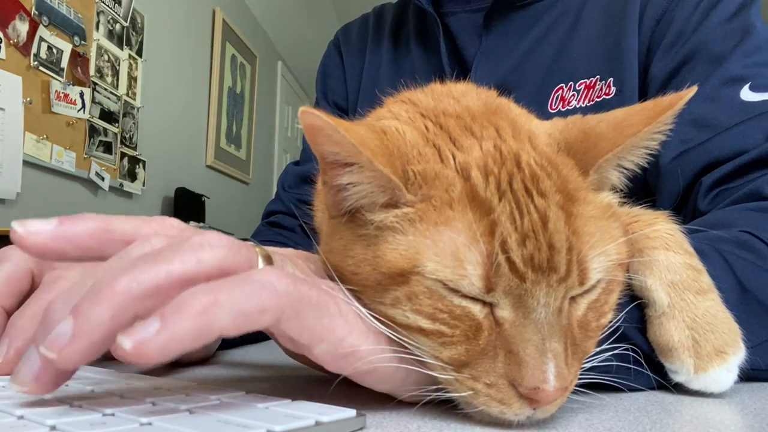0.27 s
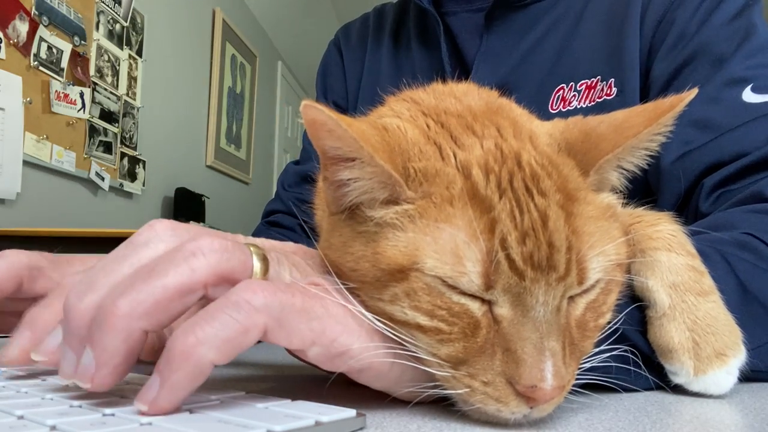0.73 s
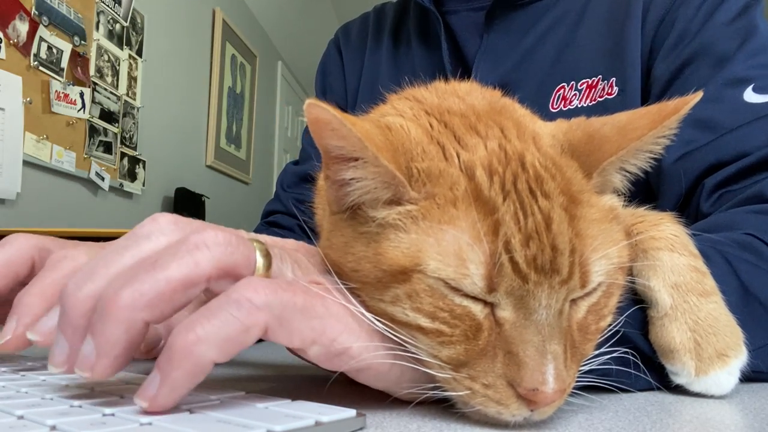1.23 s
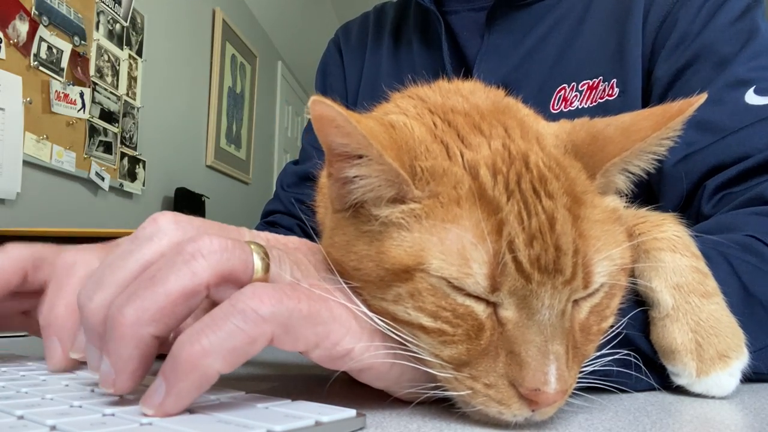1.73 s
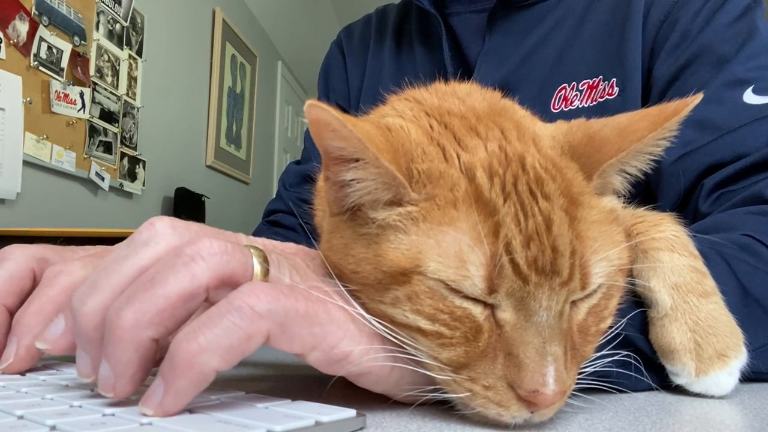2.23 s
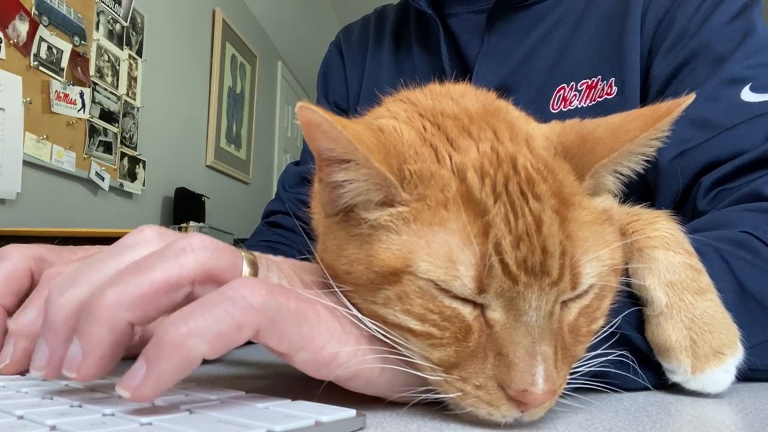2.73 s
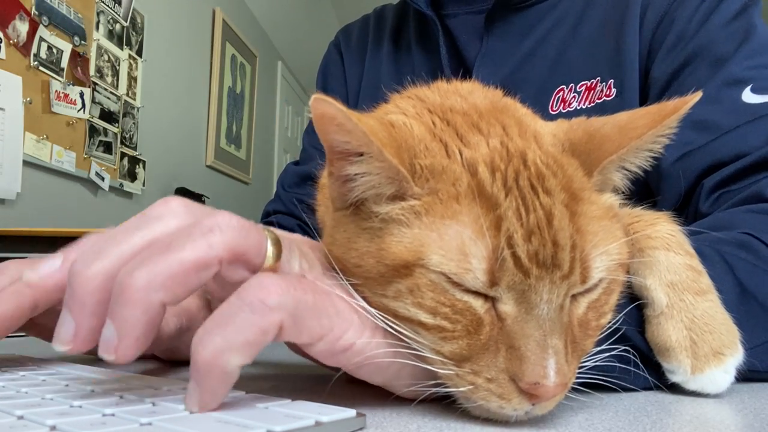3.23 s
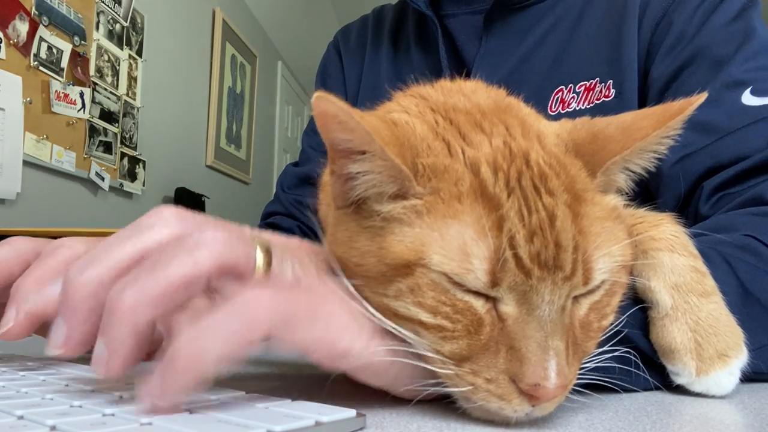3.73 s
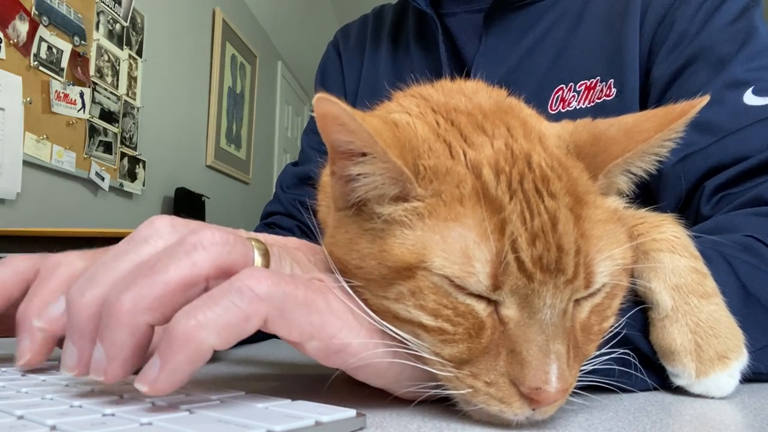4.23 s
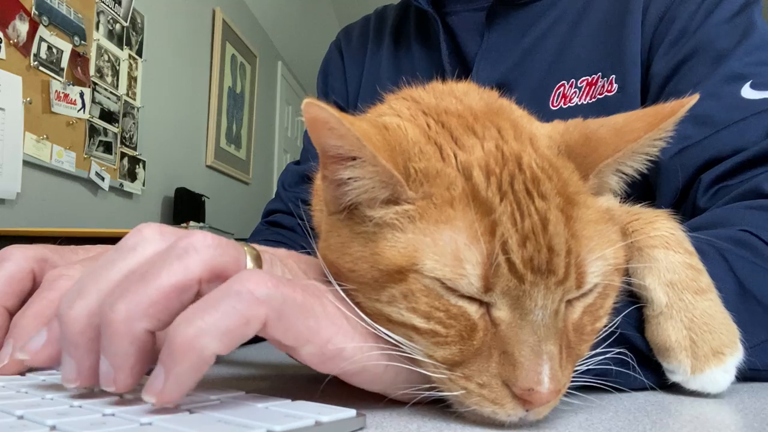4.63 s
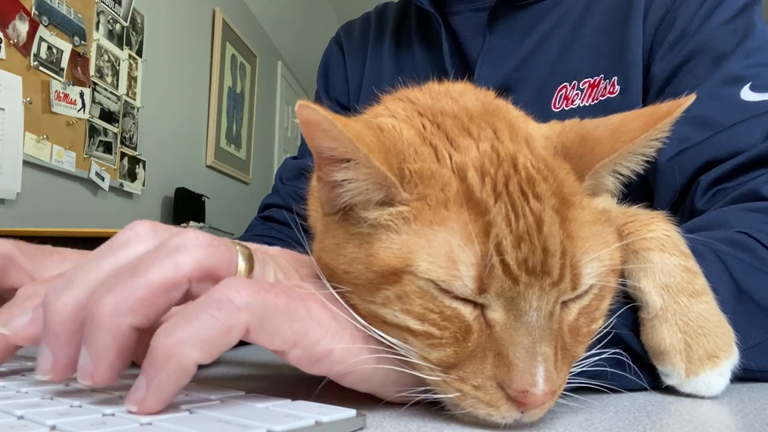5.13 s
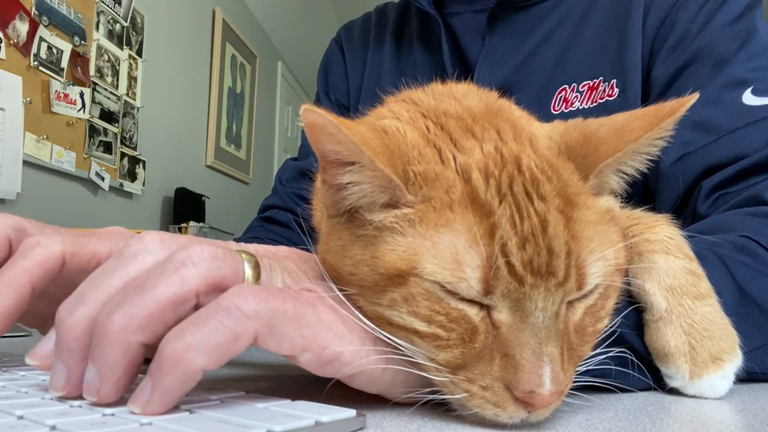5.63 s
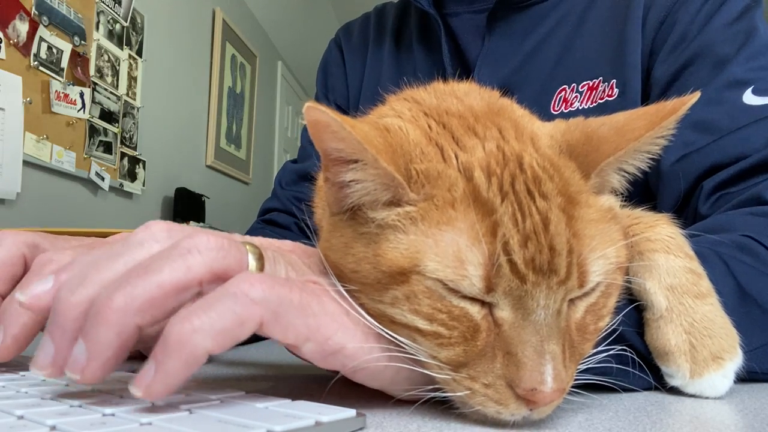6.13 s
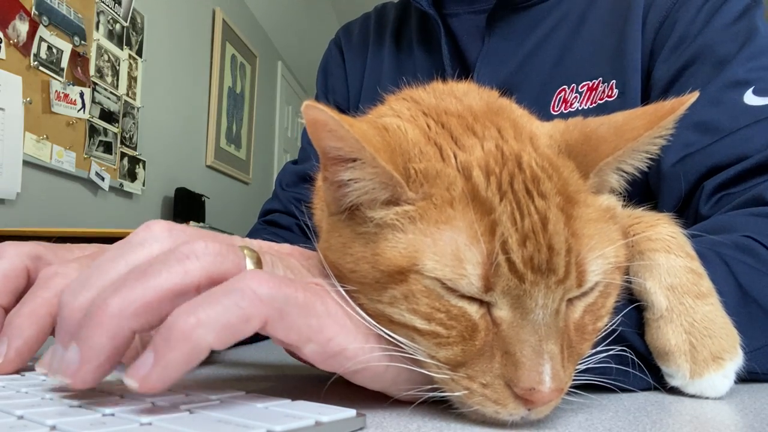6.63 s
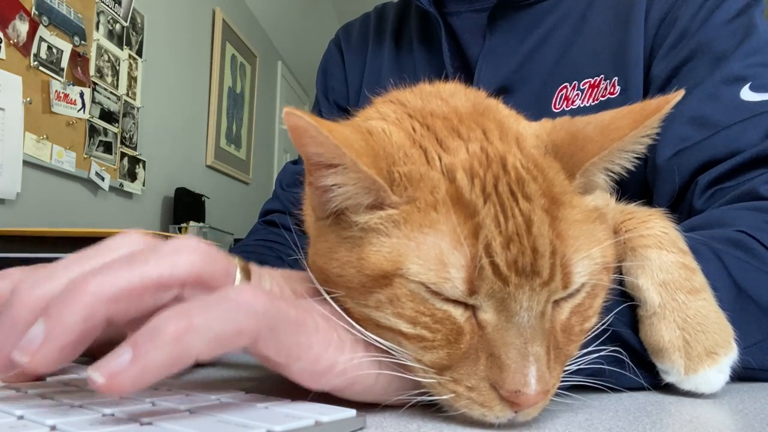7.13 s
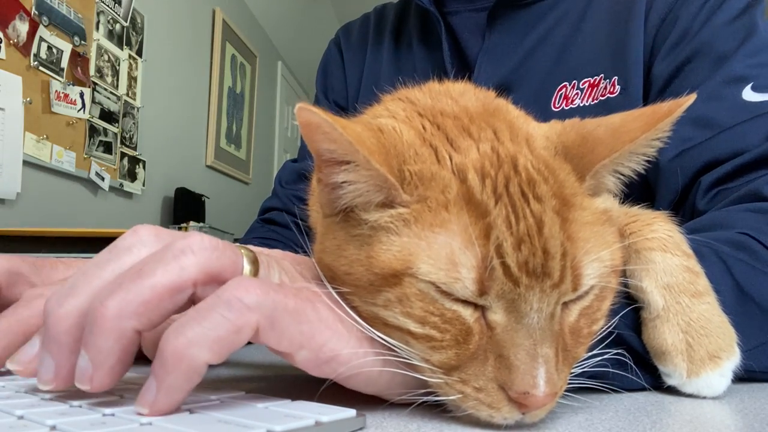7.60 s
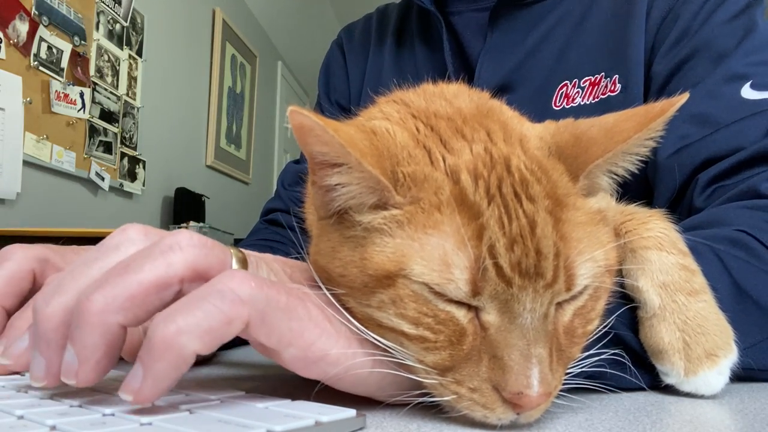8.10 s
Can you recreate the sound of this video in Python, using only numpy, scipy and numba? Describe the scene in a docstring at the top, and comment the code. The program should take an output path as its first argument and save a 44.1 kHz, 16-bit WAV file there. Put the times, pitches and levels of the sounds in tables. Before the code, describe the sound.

A cat purrs in a rough, fluttering rattle close by while fingers tap quickly and unevenly on a flat computer keyboard in a small room.

```python
"""A cat purrs as it dozes on a typist's hand, close to a phone on the desk: its larynx flaps about 28 times
a second, and each flap, a click and a puff of air, rings chest, throat and nose.
Flat plastic keys tick and clack in noise bursts, and each blow makes low modes of the desk top boom a moment
later. Once the hand rustles on the desk. Two low hums, a thin whine of narrow hiss and faint air noise fill
the small room, whose tails are decaying noise bands."""
import sys
import numpy as np
from scipy import signal
from scipy.fft import rfft, irfft
from scipy.io import wavfile
from scipy.ndimage import uniform_filter1d
from numba import njit

SR = 44100
rng = np.random.default_rng(int(sys.argv[2]) if len(sys.argv) > 2 else 0)


def waveform_to_disk(signal):
    """Save audio, clipped to [-1, 1], as 16-bit WAV at the path in sys.argv[1]."""
    frames = np.transpose(np.atleast_2d(signal))
    scaled = np.clip(frames, -1, 1) * 32767
    samples = np.round(scaled).astype(np.int16)
    wavfile.write(sys.argv[1], SR, samples)


N = 368676
T = np.arange(N) / SR
SIDES = np.array([[1], [-1]]) / 2  # left and right microphone port: half of a difference each


def undb(db):
    """Gain of a dB value."""
    return 10 ** (np.asarray(db) / 20)


def unit(x):
    """Scale to rms 1."""
    return x / np.sqrt(np.mean(x ** 2))


def fade(t, t60):
    """Exponential decay, 60 dB in t60 seconds."""
    return np.exp(-np.log(1000) * t / t60)


def along(table, hz):
    """Read a (Hz, value) table on a log-frequency axis."""
    f, v = np.transpose(table)
    return np.interp(np.log(hz + 1), np.log(f + 1), v)


def coloured(table, size):
    """Noise of rms 1 with the given spectrum."""
    spectrum = rfft(rng.standard_normal(size))
    return unit(irfft(spectrum * undb(along(table, np.fft.rfftfreq(size, 1 / SR))), size))


def walk(rate):
    """Random levels held 1 / rate s and slewed twice; rms 1."""
    k = int(SR / rate)
    held = np.repeat(rng.standard_normal(N // k + 1), k)
    return unit(uniform_filter1d(uniform_filter1d(held, k), k)[:N])


def add(out, s, sound):
    """Mix a short sound in at s seconds."""
    i = max(int(s * SR), 0)
    out[..., i:i + sound.shape[-1]] += sound[..., :N - i]


@njit
def svf(x, hz, width):
    """State-variable band-pass with a moving centre, gain 1 there."""
    y, b, l = np.empty(len(x)), 0., 0.
    for i in range(len(x)):
        g, k = np.tan(np.pi * hz[i] / SR), width[i] / hz[i]
        v = (b + g * (x[i] - l)) / (1 + g * (g + k))
        b, l, y[i] = 2 * v - b, l + 2 * g * v, k * v
    return y


def steep(x, hz, width_hz):
    """A resonance applied twice, for dark valleys; width_hz is that of one pass."""
    hz, width_hz = hz + np.zeros(N), width_hz + np.zeros(N)
    return svf(svf(x, hz, width_hz), hz, width_hz)


# spectrum of the room's air noise: (pitch_hz, relative level_db per Hz)
AIR_SPECTRUM = [(15, -60.5), (25, -11.5), (76, 7), (126, -0.5), (252, -34), (490, -49), (559, -22),
                (1090, -38.5), (1850, -33), (2170, -34), (2350, -34), (11600, -44.5), (14300, -53)]


def air():
    """Faint steady hiss and low rumble, unrelated left and right."""
    return undb(-57) * np.array([coloured(AIR_SPECTRUM, N), coloured(AIR_SPECTRUM, N)])


# low hums of the room: (pitch_hz, level_db, waver_db, phase lead at the left port_rad, left minus right_db)
HUM_TONES = [(58.45, -57, 4, 1, 1.3), (99.06, -52.5, 3.5, 0.6, 3)]


def hums():
    """Two low tones that waver a little in level and pitch."""
    out = np.zeros((2, N))
    for hz, db, waver_db, turn, pan_db in HUM_TONES:
        level = np.sqrt(2) * undb(db + waver_db * walk(3.6) + pan_db * SIDES)
        phase = 2 * np.pi * np.cumsum(hz * (1 + .014 * walk(6.7))) / SR
        out += level * np.sin(phase + turn * SIDES)
    return out


# thin whine: (pitch_hz, width_hz of one pass, level_db rms)
WHINE_BAND = (1055, 180, -77.5)


def whine():
    """A narrow band of hiss from some small fan, unrelated left and right."""
    hz, width_hz, db = WHINE_BAND
    return undb(db) * np.array([unit(steep(rng.standard_normal(N), hz, width_hz)) for _ in range(2)])


# tails of the small room: (pitch_hz, t60_s, level_db)
ROOM_TAILS = [(298, 0.14, -15.5), (756, 0.12, -24.5), (2160, 0.36, -18), (4800, .2, -17.5),
              (10000, 0.18, -16.5)]


def room(x):
    """Diffuse tails, band by band, unrelated left and right."""
    tail = 0
    for hz, t60, db in ROOM_TAILS:
        noises = [unit(steep(rng.standard_normal(N), hz, 1.89 * hz)) for _ in range(2)]
        pair = (np.array(noises) * fade(T, t60))[:, :SR // 3]
        tail = tail + undb(db) * pair / np.sqrt(np.sum(pair ** 2, axis=1, keepdims=True))
    return signal.fftconvolve(x[None], tail, axes=1)[:, :N]


def brush():
    """A soft rustle, swelling noise in a broad band, as the hand shifts on the desk."""
    swell = undb(-64.5) * np.exp(-((T - 5.06) / 0.096) ** 2)
    return swell * np.array([unit(steep(rng.standard_normal(N), 1650, 3100)) for _ in range(2)])


# low modes of the desk top: (pitch_hz, swell_s, t60_s, phase lead at the left port_rad, left minus right_db)
DESK_MODES = [(69.5, 0.01744, 0.2, 0.64, 4.5), (126, 0.01197, 0.087, -0.12, 2),
              (190.9, 0.01398, 0.11, 1, 1.5)]
# time from the tick to the crest of each mode: (delay_s for modes 1, 2, 3)
CREST_DELAYS = (0.0309, 0.02005, 0.02155)


def desk():
    """The blow spreads slowly into the desk top: each low mode swells, then dies away."""
    out, t = np.zeros((2, N)), T[:SR // 3]
    for s, _, _, *levels_db in KEY_STROKES:
        chance = rng.standard_normal((len(DESK_MODES), 2))
        for mode, crest, db, (a, b) in zip(DESK_MODES, CREST_DELAYS, levels_db, chance):
            hz, swell, t60, turn, pan_db = mode
            late = np.maximum(t - swell, 0)
            rise = np.sin(np.pi / 2 * np.minimum(t / swell, 1)) ** 2
            shape = rise * fade(late ** 2 / (late + 0.0015), t60)  # the decay sets in gently
            tone = np.sin(2 * np.pi * hz * (1 + 0.017 * a) * t + 3 * b + turn * SIDES)
            add(out, s + crest - swell, undb(db + pan_db * SIDES) * shape * tone)
        # a higher, quickly damped mode swells with the last one
        tone = np.sin(2 * np.pi * 265 * (1 + 0.2 * b) * t + 3 * a + 2.0 * SIDES)
        add(out, s + crest - swell, undb(db - 11.5) * shape * fade(late, 0.033) * tone)
    return out


# key strokes: (start_s of the tick, tick level_db, clack level_db against the tick, level_db of desk modes 1, 2, 3)
KEY_STROKES = [(0.149, -26.5, -10.5, -35.5, -38, -38), (0.235, -44.5, -25, -49, -47, -51),
               (0.242, -42, -15, -63, -60, -62), (0.307, -37.5, -10.5, -44, -38.5, -45),
               (0.409, -44, -23, -57, -47, -58), (0.44, -50, -20, -62, -58, -47),
               (0.4704, -23.5, -21.5, -36.5, -44, -28.5), (0.5554, -41.5, -24, -70, -46, -45.5),
               (0.575, -47, -16, -41, -55, -39.5), (0.6548, -31, -2, -31, -56, -43.5),
               (0.726, -44.5, -6.5, -45, -55, -53), (0.7864, -34.5, -20.5, -39.5, -68, -46),
               (0.891, -57, -18, -53, -67, -63), (0.9316, -38, -22, -42, -36.5, -40.5),
               (1.0237, -49, -31, -64, -45, -49.5), (1.0838, -20.5, -23, -30, -57, -25.5),
               (1.167, -48, -7.5, -43, -53, -57), (1.1761, -37.5, -29, -66, -47, -34),
               (1.3266, -47.5, -13, -56, -60, -79), (1.3527, -48, -1.5, -35, -43, -56),
               (1.4413, -41.5, -13, -38, -59, -62), (1.5484, -42.5, -1, -32.5, -42, -40.5),
               (1.634, -58, -26, -38, -51, -64), (1.7622, -26.5, -14, -25, -35.5, -29.5),
               (1.846, -43, -28, -39.5, -41.5, -46), (2.6053, -26.5, -8.5, -31, -40, -39.5),
               (2.6893, -45.5, -15, -60, -56, -51.5), (2.814, -27.5, -15.5, -41, -49, -30.5),
               (2.944, -45, -20, -50, -48, -36), (3.048, -48, -12, -44.5, -42.5, -41),
               (3.0975, -40, -38, -63, -60, -77), (3.1863, -42, -1, -29.5, -47, -45.5),
               (3.33, -25.5, -23.5, -41, -48, -30), (3.4248, -40.5, -19, -44, -48, -34.5),
               (3.475, -28.5, -24.5, -45, -37, -62), (3.6022, -39, -26, -43, -49, -54),
               (3.7586, -24, -16.5, -40, -28, -30.5), (3.8854, -45.5, -25, -46, -39, -42),
               (4.01, -28, -18, -24.5, -34.5, -29.5), (4.0952, -47.5, -17, -36, -48, -46),
               (4.231, -53.5, 2.5, -77, -60, -56), (4.253, -22, -27.5, -30.5, -46, -25.5),
               (4.357, -37.5, -23, -48, -43, -33), (4.4275, -42.5, -42, -62, -41, -55),
               (4.8333, -44.5, -15, -60, -60, -58), (4.8496, -43.5, -30, -43.5, -54, -58),
               (4.9326, -47.5, -22, -45.5, -56, -50), (5.082, -34.5, -24, -36, -56, -47),
               (5.137, -53.5, -25, -58, -58, -65), (5.182, -50, -29, -58, -60, -56),
               (5.295, -42, -16.5, -39, -50.5, -63), (5.424, -49, -20, -39, -46.5, -48),
               (5.571, -51, -23, -44, -49, -62), (5.9087, -28, -41, -46, -42, -49.5),
               (5.94, -51, -2, -42, -60, -60), (6.045, -42.5, -38, -62, -49, -57),
               (6.133, -47, -17, -66, -61, -56), (6.1811, -44, -41, -44, -56, -58),
               (6.3742, -37.5, -21, -36.5, -45, -40.5), (6.51, -42.5, -17, -49, -50, -35.5),
               (6.6997, -39.5, -15, -46, -39, -50), (6.8213, -43, -40, -57, -45, -51),
               (6.853, -38, -20, -34.5, -51, -51.5), (7.001, -36.5, -30, -44, -49, -51.5),
               (7.139, -28.5, -5.5, -29.5, -47, -51), (7.274, -45, -21, -62, -57, -62),
               (7.2931, -25, -19, -39, -42, -29.5), (7.3938, -43.5, -12, -47, -42.5, -35.5),
               (7.4272, -48.5, -11, -34.5, -41, -63), (7.5476, -37.5, -23, -46, -47, -52),
               (7.59, -51, -14.5, -35.5, -54, -44), (7.65, -49.5, -28, -38, -59, -51),
               (7.9466, -50, -28, -49, -71, -78), (8.299, -38.5, -9, -41, -44, -41)]
# spectrum of a tick: (pitch_hz, relative level_db per Hz)
TICK_SPECTRUM = [(1650, -28), (2800, -15.5), (3100, -16), (5460, -6.5), (6990, -10.5), (7840, -12),
                 (8510, -12), (11300, -15), (14300, -21.5)]
# resonances of the keyboard case: (pitch_hz, width_hz, level_db)
CASE_RESONANCES = [(1437, 360, 0.5), (1588, 250, 2.5), (2077, 680, -0.5), (2636, 370, -6)]


def keys():
    """A fingertip scuffs the cap, the key ticks and bounces; case and fingertip add clack and knock."""
    out, t = np.zeros((2, N)), T[:SR // 4]
    size = len(t)
    hz = np.fft.rfftfreq(size, 1 / SR)
    case = sum(undb(db) / (1 + 2j * (hz - f) / w) ** 2 for f, w, db in CASE_RESONANCES)
    pad = 1 / (1 + ((hz - 900) / 350) ** 4)  # the fingertip's dull band
    lead_s, spread_s = .009, .00016  # scuff before the tick; keys lie left and right of the ports
    after = np.maximum(t - lead_s, 0)
    landed = np.minimum(after / 0.001, 1)
    scuff = (t < lead_s) * .16 * (t / lead_s)
    chance = rng.standard_normal((len(KEY_STROKES), 2))
    for (s, db, clack_db, *_), (place, tilt) in zip(KEY_STROKES, chance):
        bounces = undb(5.9 * np.repeat(rng.standard_normal(size // 48 + 1), 48)[:size])
        blow = scuff + landed * (fade(after, 0.013) + .5 * bounces * fade(after, 0.034))
        tick = .5 * coloured(TICK_SPECTRUM, size) * blow
        # the key bottoms out a moment after the tick, and the loose case rattles on
        bottom = np.exp(-((after - .005) / 0.002) ** 2) + 0.3 * landed * fade(after, 0.2)
        clack = irfft(rfft(rng.standard_normal(size) * bottom * (t > lead_s)) * case, size)
        knock = unit(irfft(rfft(rng.standard_normal(size)) * pad, size)) * landed * fade(after, 0.1)
        near = tick + 1.76 * undb(clack_db) * clack / np.max(np.abs(clack)) + 0.45 * undb(-16.5) * knock
        for side in range(2):
            # desk and wall scatter each tick into a short wash of its own at each port
            wash = 0.058 * coloured(TICK_SPECTRUM, size) * landed * fade(after, 0.18)
            arrival = s - lead_s + spread_s * place * (side - .5)
            add(out[side], arrival, undb(db + 2.0 * tilt * (side - .5)) * (near + wash))
    return out


# stages of breathing, each lasting until the next:
# (start_s of the first flap, stage, flap rate_hz, early throat level_db, late throat level_db)
BREATH_STAGES = [(0.028, "in", 28.82, -61.5, -62.5), (0.517, "faint", 28.83, -73.5, -72),
                 (1.388, "out", 29.16, -60, -62), (2.112, "pause", 28.27, -85.5, -80),
                 (2.466, "in", 28.52, -66, -56), (2.997, "crest", 28.42, -54.5, -54.5),
                 (3.245, "faint", 27.7, -73.5, -71.5), (4.111, "out", 29.8, -59, -62),
                 (4.85, "pause", 28.43, -78.5, -75.5), (5.2, "coo", 28.58, -53, -47.5),
                 (5.377, "in", 28.23, -55, -66), (6.372, "faint", 27.6, -74.5, -73),
                 (7.062, "out", 29.95, -59.5, -63.5), (7.831, "pause", 27.26, -83.5, -83),
                 (8.264, "in", 28.23, -64, -59)]
# voice of each stage: (chest level_db, nose level_db, early throat pitch_hz, late throat pitch_hz,
# second flap_0-1, roughness_0-1); chest and nose are relative to the throat
STAGE_VOICES = {"in": (2, -4, 907, 865, 0.06, 0.79), "crest": (-5.5, -9, 1020, 855, 0.98, 0.4),
                "out": (4.5, -11, 812, 861, 0.32, 0.84), "coo": (-10.5, -15, 695, 788, 0.02, 0.15),
                "faint": (7.5, -7.5, 911, 938.5, 0.56, 0.3), "pause": (6.5, -4.5, 935, 916, .5, 0.78)}


def breathing():
    """Flap times, and throat level and pitch, chest, nose, second flap, roughness gliding between stages."""
    ease_share, ease_most_s = 0.21, 0.093  # glide at each end of a stage: share of the stage, longest
    ends = [row[0] for row in BREATH_STAGES[1:]] + [N / SR]
    times, s, rows = [], [], []
    for (start, stage, hz, early_db, late_db), end in zip(BREATH_STAGES, ends):
        chest_db, nose_db, early_hz, late_hz, second, rough = STAGE_VOICES[stage]
        times += list(np.arange(start, end - .5 / hz, 1 / hz))
        ease = min(ease_share * (end - start), ease_most_s)
        s += [start + ease, end - ease]
        rows.append((early_db, early_hz, chest_db, nose_db, second, rough))
        rows.append((late_db, late_hz, chest_db, nose_db, second, rough))
    return times, [np.interp(T, s, c) for c in np.transpose(rows)]


# the hardest snaps of the larynx, heard singly: (start_s, level_db)
HARD_SNAPS = [(0.028, -34), (0.094, -34), (0.268, -33.5), (0.446, -36.5), (1.495, -42.5), (1.54, -28),
              (1.63, -27.5), (1.709, -36), (1.905, -36.5), (1.931, -34.5), (1.979, -43), (2.745, -38),
              (2.921, -34), (2.999, -33), (3.101, -35), (3.14, -35), (3.175, -23), (3.456, -34),
              (4.174, -36.5), (4.311, -30.5), (4.373, -36.5), (4.438, -34), (4.473, -36), (5.377, -37),
              (5.412, -23.5), (5.545, -38.5), (5.652, -33), (5.691, -35.5), (6.017, -45), (7.062, -39.5),
              (7.089, -35.5), (7.193, -32.5), (7.258, -38), (7.35, -29), (7.392, -30.5), (7.49, -40),
              (7.526, -36), (7.63, -43), (7.694, -38.5), (7.766, -38.5)]


def snaps():
    """A hard closure rings throat and chest for a few cycles and spits a little air through the nose."""
    out, t = np.zeros(N), T[:SR // 16]
    spit_band = signal.butter(2, [4000, 9000], "bandpass", fs=SR, output="sos")
    chest_db = breathing()[1][2] - 11.5
    for (s, db), g in zip(HARD_SNAPS, rng.standard_normal((len(HARD_SNAPS), 3))):
        throat = .6 * np.sin(2 * np.pi * 760 * (1 + .08 * g[0]) * t) * fade(t, .016)
        throat += .6 * np.sin(2 * np.pi * 1150 * (1 + .08 * g[1]) * t) * fade(t, .012)
        chest = np.sin(2 * np.pi * 340 * (1 + 0.083 * g[2]) * t) * fade(t, 0.039)
        chest *= undb(chest_db[int(s * SR)])
        spit = 0.057 * unit(signal.sosfilt(spit_band, rng.standard_normal(len(t)))) * fade(t, 0.01)
        add(out, s, undb(db) * np.minimum(t / 0.00094, 1) * (throat + chest + spit))
    return out


# chest resonances: (pitch_hz, width_hz of one pass, level_db)
CHEST_RESONANCES = [(199, 102, 1), (268.4, 66, -4), (320.9, 71.4, 0), (389, 47.4, -3)]
# nose resonances: (pitch_hz, width_hz of one pass, level_db before flicker)
NOSE_RESONANCES = [(2860, 3600, 0), (4560, 610, 4.5), (5280, 1830, -0.5), (7150, 1700, -9),
                   (8610, 2000, -13.5)]
# flaps that hardly close: (time_s, ...)
STUMBLE_TIMES = [5.517, 5.622, 6.09, 6.16]


def purr():
    """Each flap is a click and a puff of air; both excite the nose, click and crackle throat and chest."""
    times, (throat_db, throat_hz, chest_db, nose_db, *shares) = breathing()
    second, rough = np.clip(shares, 0, 1)
    clicks = np.zeros(N)
    for at, (early, size_db, gap, echo_db) in zip(times, rng.standard_normal((N // 1000, 4))):
        i = int((at + .0012 * early) * SR)
        stumbles = np.min(np.abs(at - np.array(STUMBLE_TIMES))) < .015
        clicks[i] += undb(9 * rough[i] * np.tanh(size_db) - 29 * stumbles)
        # the folds bounce once more, as strongly as the stage's second flap
        j = min(i + int((.011 + 0.0028 * gap) * SR), N - 1)
        clicks[j] += second[i] * undb(4.0 * np.tanh(echo_db))
    # air streams while the folds stand open
    opening = T[:SR // 20]
    gust = np.minimum(opening / .003, 1) * fade(opening, .15) / (1 + (opening / .014) ** 6)
    puff = signal.fftconvolve(clicks, gust)[:N] + 0.01  # a little leaks between flaps
    hiss = unit(puff * rng.standard_normal(N))
    # wet folds break the stream into sharp slaps
    crackle = unit(puff * rng.standard_normal(N) * (.03 + (rng.random(N) < .006)))
    drive = np.sqrt(1 - rough) * unit(clicks) + np.sqrt(rough) * crackle
    # a smooth flap leaves the throat ringing narrowly, a rough one spreads it
    clear = unit(steep(drive, throat_hz, 100 + 350 * rough))
    spread = unit(steep(drive, 780, 380) - .8 * steep(drive, 1180, 480))
    throat = (1 - rough) ** 2 * clear + rough * spread
    chest = sum(undb(db) * steep(drive, hz, w) for hz, w, db in CHEST_RESONANCES)
    nose = np.zeros(N)
    for hz, width_hz, db in NOSE_RESONANCES:
        flicker = undb(1.9 * walk(28))
        nose += undb(db) * flicker * steep(hiss + 0.62 * unit(clicks), hz, width_hz)
    voice = unit(throat) + undb(chest_db) * unit(chest) + undb(nose_db) * unit(nose)
    # chest and throat cancel between their resonances: a valley at 540 Hz
    voice = voice - .8 * svf(voice, np.full(N, 540.), np.full(N, 140.))
    return undb(throat_db) * voice


# the cat's balance at the phone's ports: (pitch_hz, left minus right_db)
CAT_BALANCE = [(200, -5), (450, -4), (750, -15), (1300, -2), (2200, 4), (4500, -6.5)]


def ports(x):
    """The cat lies nearer the right port: earlier there, and louder except around 2 kHz."""
    lag_s = .00025
    hz = np.fft.rfftfreq(N, 1 / SR)
    delay = np.exp(-2j * np.pi * hz * lag_s * SIDES)
    return irfft(rfft(x) * undb(along(CAT_BALANCE, hz) * SIDES) * delay, N)


def scene():
    """Cat, keys, desk and hums at the ports, the room around them."""
    cat, taps = purr() + snaps(), keys()
    background = air() + hums() + whine() + room(cat + .5 * taps[0])
    return background + brush() + desk() + taps + ports(cat)


# phase between the channels in the treble: (pitch_hz, phase lead of the left channel_rad)
TREBLE_PHASE = [(6000, -.8), (7000, -.4), (8500, 0), (10000, .5), (12000, 1.7), (14000, 3)]


def record(dry):
    """The phone feeds both channels from one port in the treble, phase-turned apart, and cuts the top."""
    hz, both = np.fft.rfftfreq(N, 1 / SR), rfft(dry)
    shared = np.interp(hz, (5500, 7500), [0, 1])  # from two ports to one
    turned = both[1] * np.exp(1j * along(TREBLE_PHASE, hz) * SIDES)
    mixed = irfft((1 - shared) * both + shared * turned, N)
    top_cut = signal.ellip(8, .2, 70, 15000, fs=SR, output="sos")
    return signal.sosfilt(top_cut, mixed)


dry = scene()
out = record(dry)
waveform_to_disk(out)
```